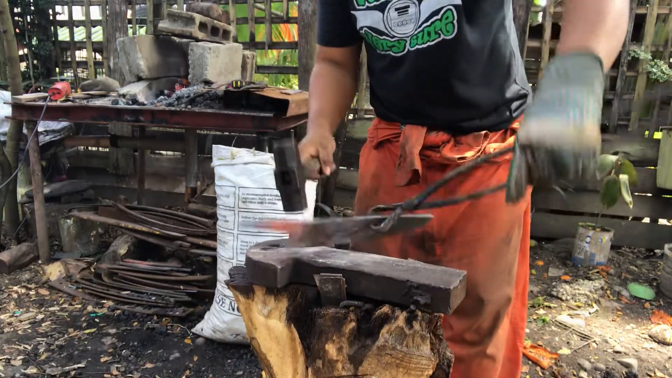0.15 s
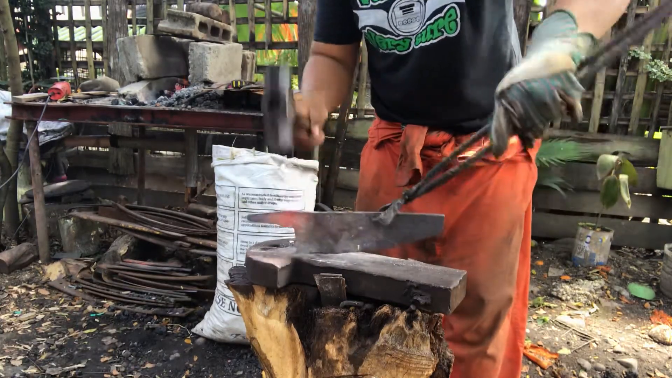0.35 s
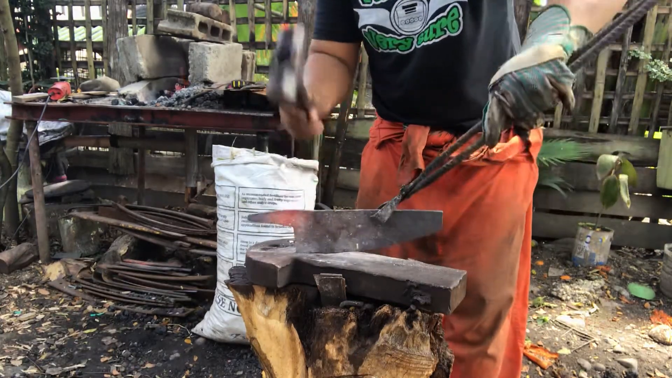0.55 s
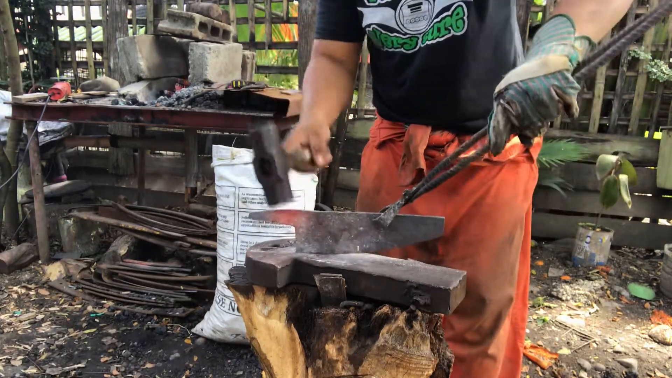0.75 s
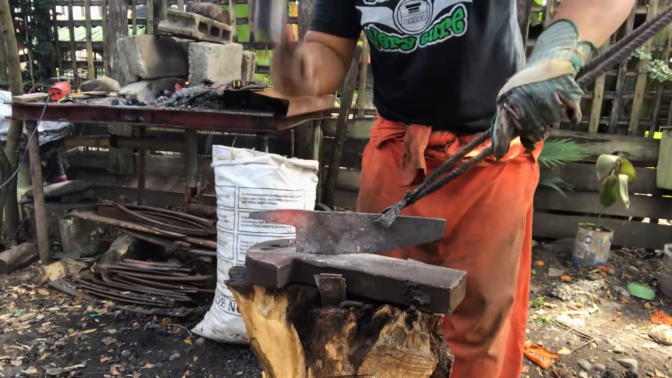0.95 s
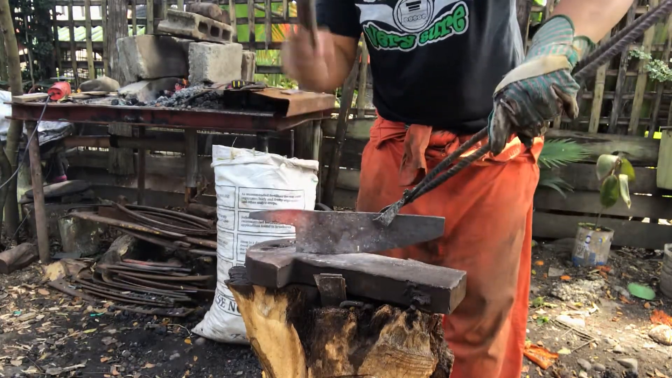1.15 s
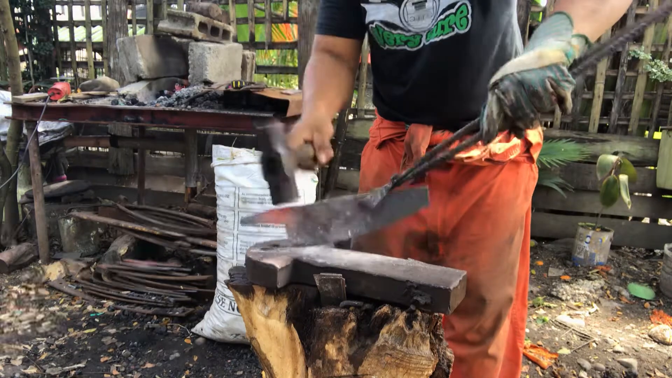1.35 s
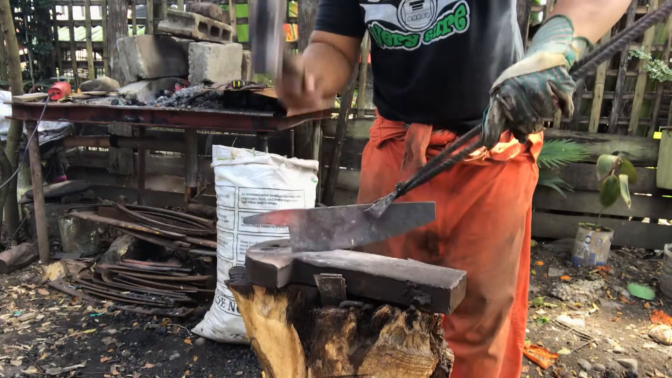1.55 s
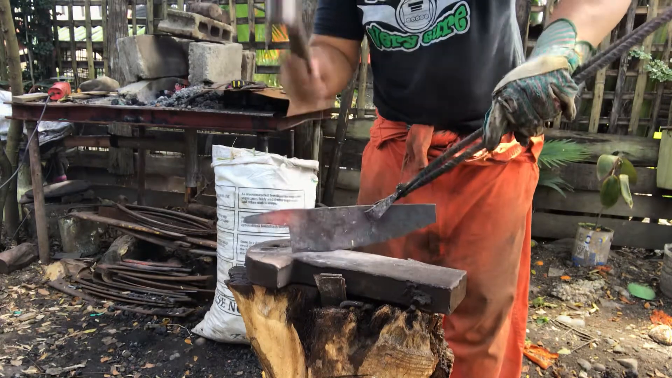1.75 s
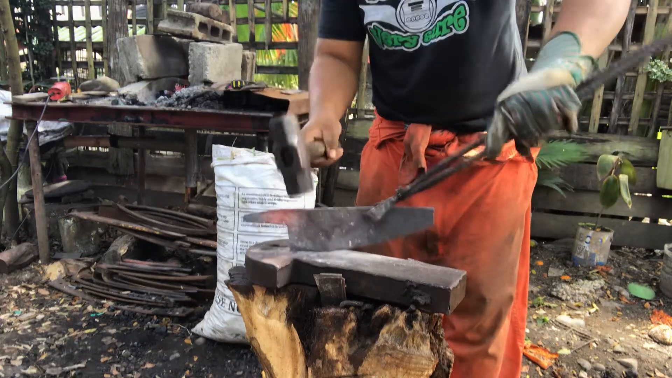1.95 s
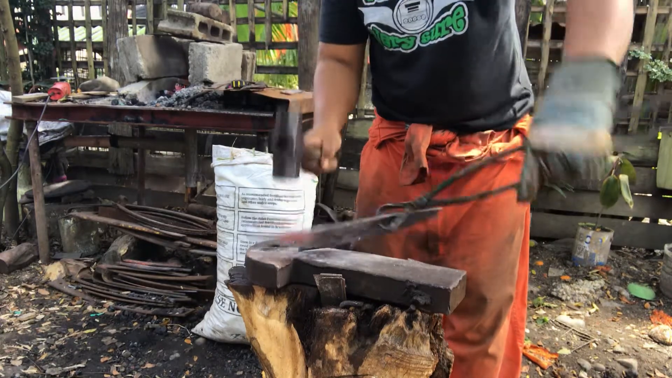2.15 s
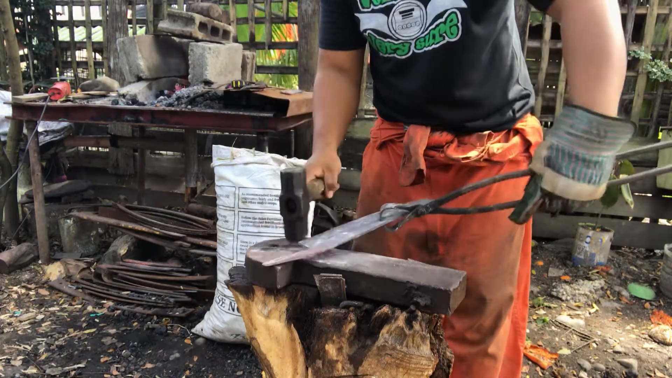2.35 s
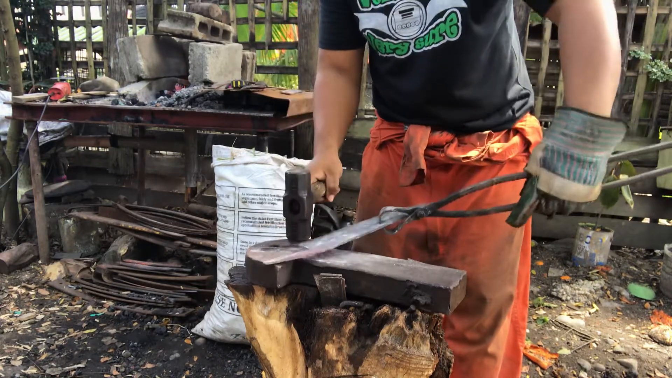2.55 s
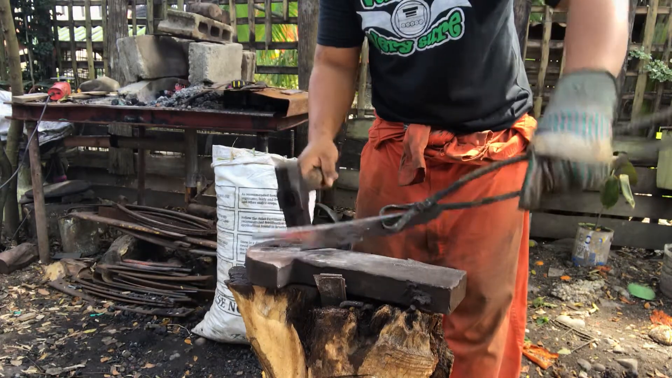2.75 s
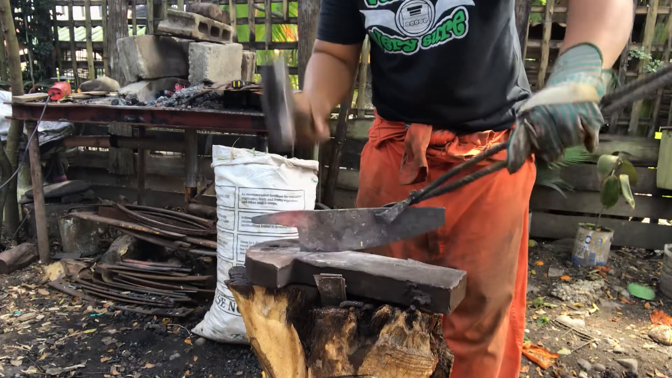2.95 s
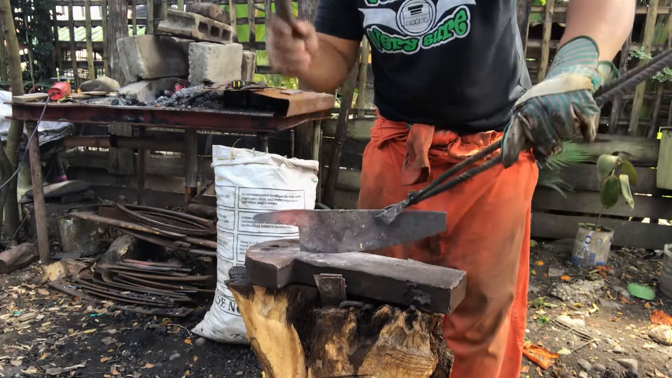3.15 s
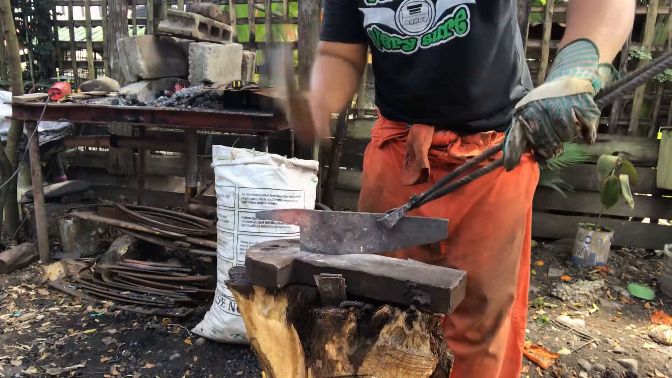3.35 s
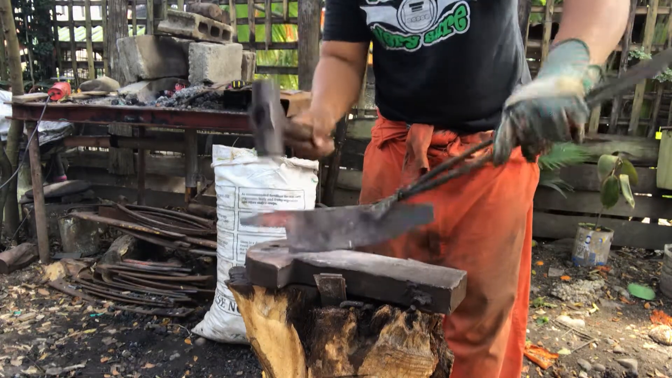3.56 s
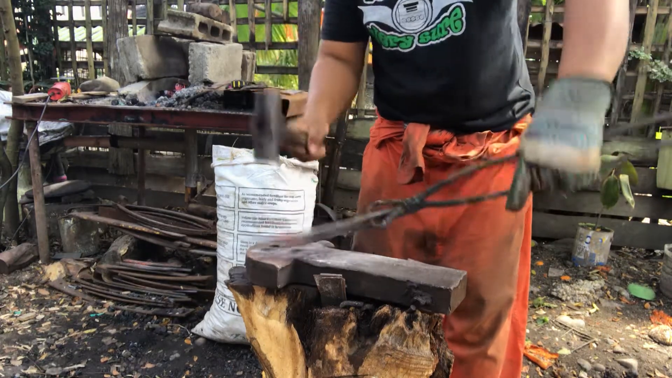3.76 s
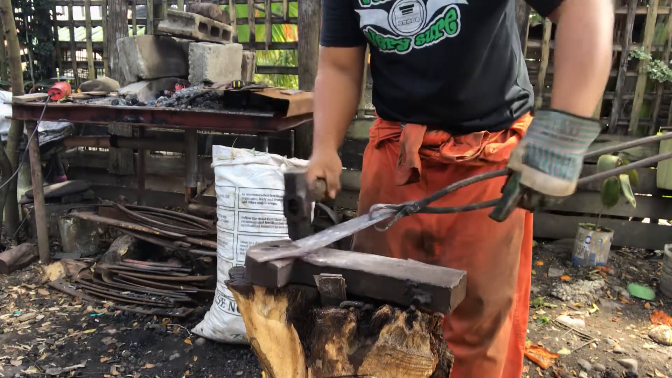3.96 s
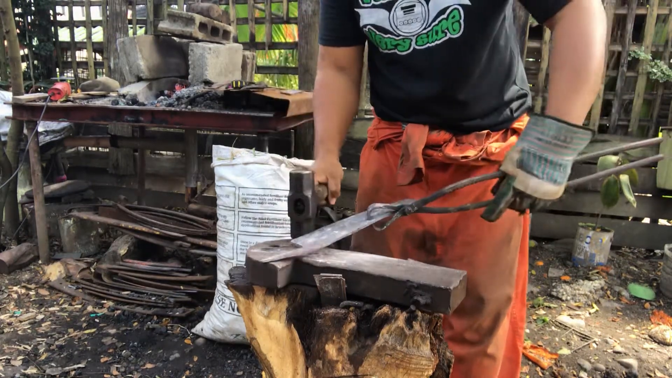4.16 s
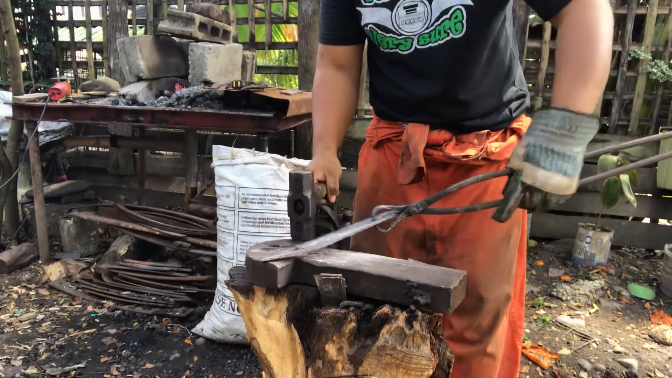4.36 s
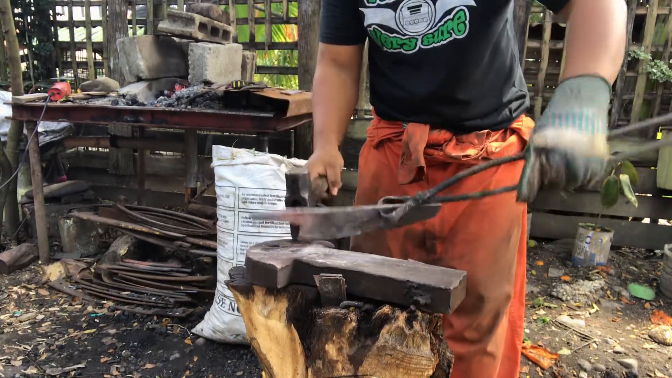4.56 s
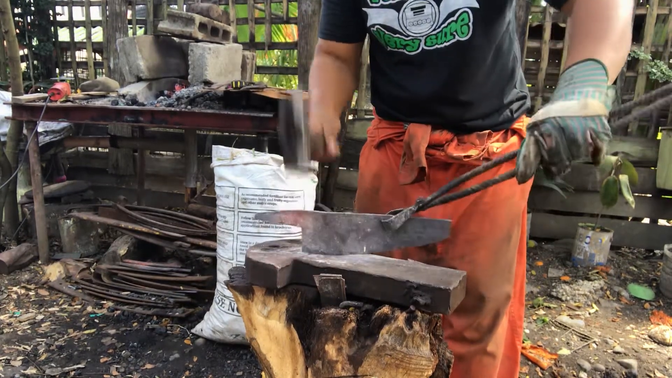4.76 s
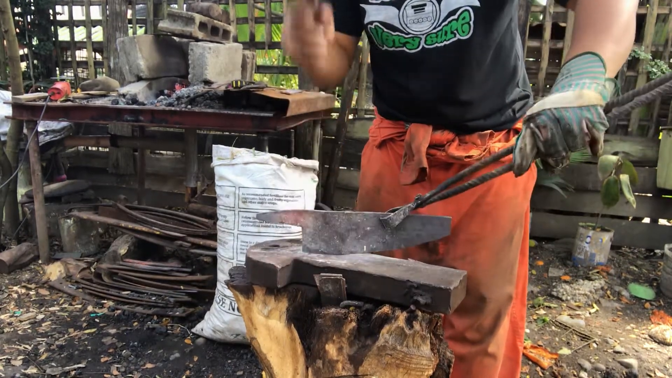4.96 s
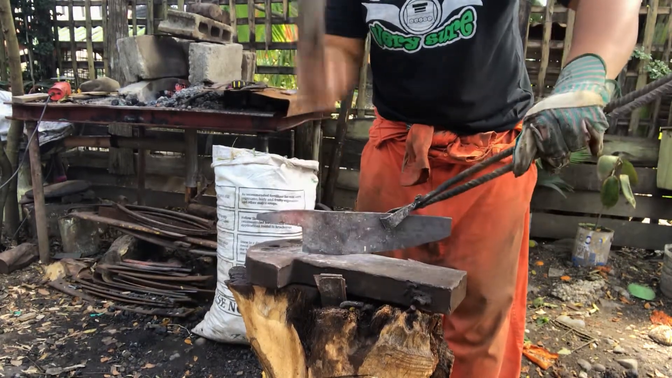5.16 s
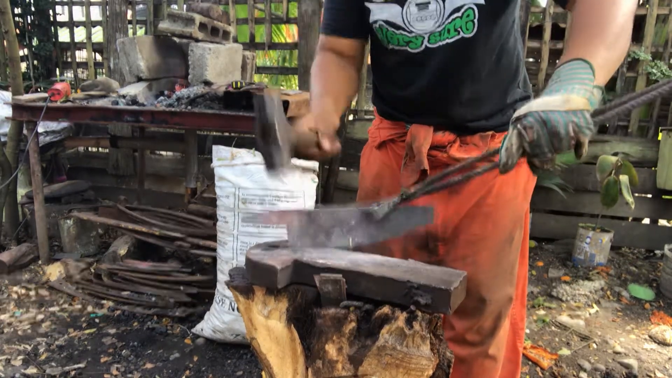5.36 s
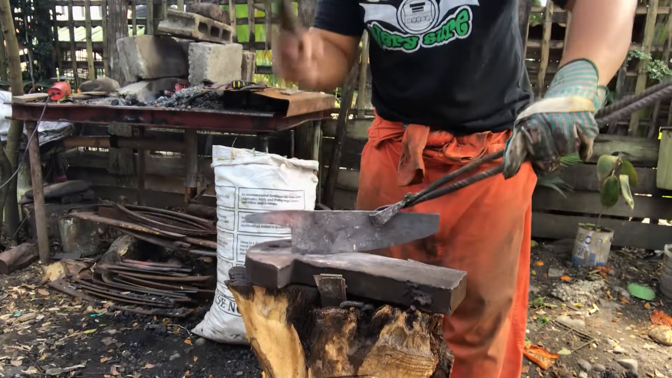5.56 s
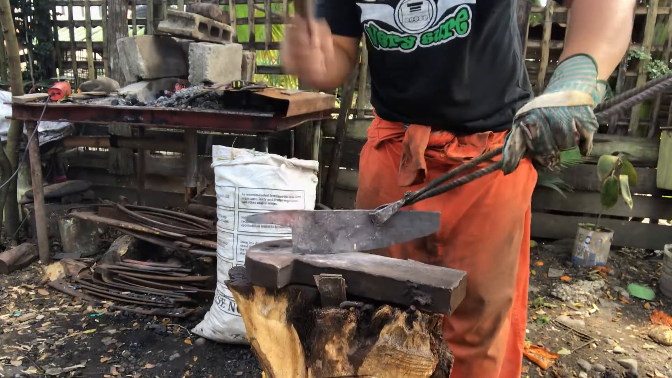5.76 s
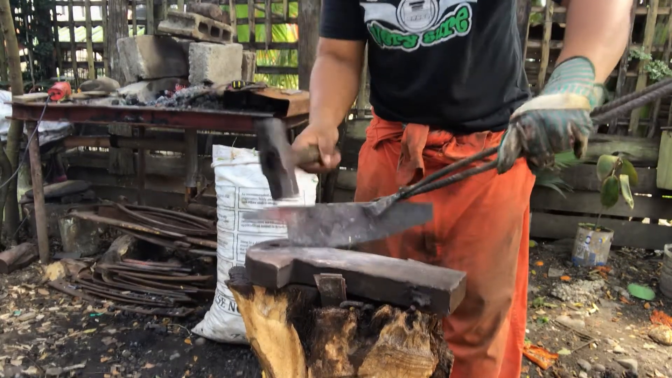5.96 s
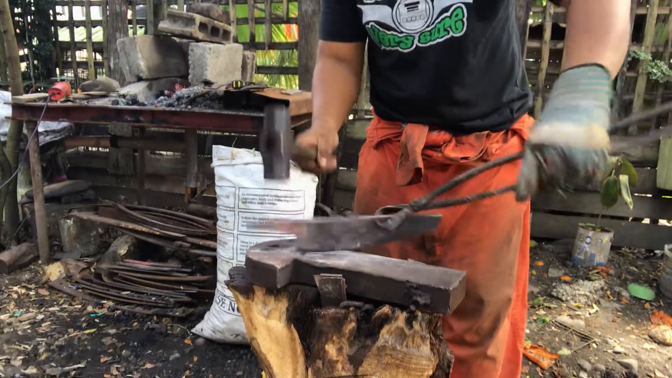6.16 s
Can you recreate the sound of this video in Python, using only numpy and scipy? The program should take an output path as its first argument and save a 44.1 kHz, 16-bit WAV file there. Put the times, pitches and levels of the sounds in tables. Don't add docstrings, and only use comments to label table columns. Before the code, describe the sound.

Close to the microphone, a hammer forges a blade on a steel bar set on a wooden stump. A light tap leads into three hard, bright, ringing blows, then duller damped ones with small metallic ticks and a short buzz as the blade is shifted. One blow falls soft and choked before two hard final strikes. Low wind rumble and faint leaf hiss surround it in an open yard.

```python
import sys
import numpy as np
from scipy import signal
from scipy.fft import rfft, irfft, next_fast_len
from scipy.io import wavfile
from scipy.ndimage import uniform_filter1d, minimum_filter1d, map_coordinates

SR = 44100
rng = np.random.default_rng(int(sys.argv[2]) if len(sys.argv) > 2 else 0)


def transcribe(u):
    v = np.clip(np.atleast_2d(u).T, -1, 1)
    q = np.round(v * 32767).astype(np.int16)
    wavfile.write(sys.argv[1], SR, q)


def elevation(decibels):
    levels = np.asarray(decibels, float)
    return 10 ** (levels / 20)


N = 273420

# start_s, crack_db, thud_db, clatter_db, blade_damping_db_per_s
BLOWS = [
    (0.2644, -23.5, -27.5, -62, 42),
    (0.6947, -0.5, -6.5, -27.5, 4.5),
    (1.301, 0, -14, -20, -3),
    (1.9006, -2.5, -7.5, -21, 7),
    (2.3291, -7.5, -25.5, -35.5, 77),
    (3.471, -1.5, -14, -21, 67.5),
    (3.996, -6.5, -27.5, -26, 116.5),
    (4.7494, -14.5, -36, -39.5, 149.5),
    (5.2978, -0.5, -8.5, -21.5, 48),
    (5.9494, -5, -9.5, -19.5, -2.5),
]
# ring_db, place_along_0_1, place_across_0_1, hardness_db_per_octave, lowest_mode_t60_s
LANDING = [(-34.7, 0.641, 0.521, -5.9, 0.26), (-14.0, 0.259, 0.373, -5.7, 0.2),
           (-1.0, 0.63, 0.496, -1.9, 0.31), (-17.1, 0.354, 0.403, 1.6, 0.27),
           (-9.1, 0.312, 0.048, -1.4, 0.29), (-5.4, 0.624, 0.006, -3.4, 0.25),
           (-2.9, 0.91, 0.677, -0.4, 0.3), (-25.0, 0.605, 0.392, -1.0, 0.21),
           (-1.7, 0.612, 0.255, 0.4, 0.29), (-2.6, 0.638, 0.66, 2.3, 0.25)]
# pitch_hz, t60_s, level_db, half_waves_along, half_waves_across
BAR_MODES = [(1530.0, 0.3, 10.8, 1.37, 0.42), (2246.0, 1.5, -0.9, 1.61, 1.71),
             (5633.0, 0.33, -2.3, 1.77, 0.57), (2735.0, 0.6, -24.01, 6.42, 2.13),
             (6142.0, 1.1, -32.47, 5.4, 2.25), (7569.0, 0.45, -23.95, 6.18, 1.17),
             (7981.0, 0.2, -6.7, 3.3, 0.5), (11535.0, 0.27, -23.5, 4.25, 2.3),
             (15335.0, 0.25, -19.27, 5.49, 5.31), (5593.0, 0.22, -14.1, 4.45, 0.0),
             (11443.0, 0.16, -18.58, 6.57, 3.78), (10120.0, 0.27, -29.9, 4.18, 0.72),
             (13670.0, 0.33, -21.7, 3.24, 0.69)]
# pitch_hz, t60_s, level_db, half_waves_along, half_waves_across
BEATING_MODES = [(3709, .4, 4.2, 3.29, 1.01), (3693, .7, -25, 2.85, 3.75), (3705.3, .9, -21.5, 2.19, 3.33)]
# pitch_hz, level_db, t60_s
WEAK_MODES = [(1165, -42.5, .25), (1750, -34.5, .2), (3190, -52.5, 0.23), (4258, -30, .25),
              (4700, -48.5, .2), (5650, -45.5, 0.28), (6230, -41.5, 0.16), (7311, -38.5, .13),
              (8840, -35, 0.25), (10400, -81, 0.092), (12200, -53.5, .25), (12795, -45.5, .2)]
# pitch_hz, width_hz, level_db
THUD_MODES = [(160, 120, -29), (318, 98, -1), (430, 90, -2), (577, 164, 11), (1000, 310, -5.5)]
# freq_hz, level_db_per_hz
CRACK_SPECTRUM = [(500, -25), (1100, 4), (3000, 2), (6000, -3), (10000, -15), (14000, -8.5), (16500, -28.5)]
# freq_hz, level_db_per_hz
CLATTER_SPECTRUM = [(300, -13), (700, -3.5), (2000, -5.5), (5000, -4.5), (9000, -14), (15000, -17.5),
                    (16500, -27.5)]
# start_s, peak_db, low_rel_db, bar_ring_db
TICKS = [(0.4738, -38, -7, -66), (1.4183, -44.5, 9, -63), (2.1565, -37.5, -29, -72), (2.6594, -36, -5, -77),
         (3.5984, -22, 1.5, -61.5), (3.6174, -28, 2, -37), (3.6344, -47, 15, -62), (3.8397, -32.5, -4, -72),
         (3.9454, -33, -8, -60), (4.0444, -26, 6, -49), (4.2662, -35.5, -1.5, -67), (4.4672, -35, 0, -60),
         (4.767, -38.5, 16.5, -59), (5.4231, -13.5, -4, -54.5), (5.4444, -26, -5.5, -32.5),
         (5.6765, -35, -3.5, -59), (6.0387, -15.5, -4.5, -52.5)]
# start_s, end_s, level_db
RATTLES = [
    (2.335, 2.453, -27.5),
    (4.0, 4.1, -29),
    (2.31, 2.33, -49),
]
# freq_hz, level_db_per_hz
BUZZ_SPECTRUM = [(800, -33), (2000, -24.5), (5000, 3.5), (9000, 4.5), (12000, -10.5), (15500, -16),
                 (16500, -18)]
# delay_s, level_db
ECHOES = [(.0032, -8), (.0058, -13), (.0105, -19), (.017, -26)]
# time_s, level_db
WIND_COURSE = [(0.0, -63), (0.55, -54), (0.67, -46), (0.83, -57), (1.14, -58.5), (1.55, -41), (1.83, -46.5),
               (2.26, -60), (3.02, -56.5), (3.9, -48.5), (4.27, -41.5), (4.45, -50), (4.73, -46),
               (5.08, -49), (5.3, -42.5), (5.65, -54), (6.2, -44.5)]
# freq_hz, level_db_per_hz
RUMBLE_SPECTRUM = [(12, -41.5), (20, -15), (54, 2.5), (80, 1), (134, -5.5), (256, -23), (300, -27.5),
                   (390, -47), (660, -120)]
# start_s, peak_db, pitch_hz
PUFFS = [(0.599, -39.5, 69), (1.529, -36, 77.5), (1.614, -30, 114), (1.711, -26.5, 107), (3.915, -50, 90),
         (4.281, -36.5, 59.6), (4.401, -45.5, 100), (4.56, -42.5, 61), (4.856, -30, 88),
         (4.895, -14.5, 71.4), (5.05, -54.5, 68.7), (5.22, -54, 60), (5.769, -55.5, 79.8),
         (5.849, -58, 60.4)]
# centre_s, width_s, rise_db
SWELLS = [
    (3.6, 0.46, 2),
    (4.549, 0.3, 3.5),
]
# freq_hz, level_db_per_hz
HISS_SPECTRUM = [(88, -37), (150, -5.5), (255, -3), (518, -7), (583, -6.5), (767, -7.5), (2010, -12.5),
                 (2220, -15), (2500, -14), (6680, -19), (10500, -26.5), (15300, -24.5), (16500, -51.5)]
# centre_s, level_db, pitch_hz
KNOCKS = [(.91, -45, 710), (1.69, -45.5, 845), (2.84, -44.5, 846), (3.135, -46.5, 644), (4.25, -41, 560),
          (4.56, -46, 770), (5.771, -47, 1000), (5.77, -45, 514)]
# centre_s, level_db, from_hz, to_hz
CHIRPS = [
    (4.555, -58, 3900, 4050),
    (4.585, -60, 5300, 5600),
]


def unit(x):
    return x / np.sqrt(np.mean(x ** 2) + 1e-20)


def noise(spectrum, size):
    hz, db = np.transpose(spectrum)
    m = next_fast_len(size + 2048)
    log_bins = np.log(np.fft.rfftfreq(m, 1 / SR) + 1)
    gain = elevation(np.interp(log_bins, np.log(hz), db, left=-120, right=-120))
    return unit(irfft(rfft(rng.standard_normal(m)) * gain, m)[:size])


def wobble(rate_hz):
    knots = rng.standard_normal(int(N * rate_hz / SR) + 4)
    return map_coordinates(knots, [np.arange(N) * rate_hz / SR])


def add(track, start_s, sound):
    part = track[round(start_s * SR):][:len(sound)]
    part += sound[:len(part)]


def ring(t, hz, db, t60_s, rise_s=0.00067):
    return elevation(db - 60 * t / t60_s) * np.sin(2 * np.pi * hz * t) * (1 - np.exp(-t / rise_s))


def impact(t, crack_db, thud_db, clatter_db):
    light_db, dull_db, clatter_t60_s = -6.5, 14, 0.15
    thud = sum(ring(t, hz, db + thud_db + rng.normal(0, 1.8), 1.75 / width_hz, rise_s=0.0017)
               for hz, width_hz, db in THUD_MODES)
    spectrum = [(hz, db - dull_db * (hz > 7000) * (crack_db < light_db)) for hz, db in CRACK_SPECTRUM]
    crack = elevation(crack_db - 60 * t / 0.014) * noise(spectrum, len(t))
    clatter = elevation(clatter_db - 60 * t / clatter_t60_s) * noise(CLATTER_SPECTRUM, len(t))
    return thud + crack + clatter


def bar_ring(t, landing, damping):
    ring_db, along_pos, across_pos, hardness, lowest_t60_s = landing
    mode_hz, mode_t60_s, mode_db, along, across = np.transpose(BAR_MODES + BEATING_MODES)
    shape = np.sin(np.pi * along * along_pos) * np.cos(np.pi * across * across_pos)
    tilt_db = hardness * np.log2(mode_hz / mode_hz[0])
    level_db = ring_db + mode_db + 20 * np.log10(np.abs(shape) + .01) + tilt_db + 4
    t60_s = 60 / (60 / mode_t60_s + damping * (mode_hz[1] / mode_hz) ** 0.86)
    lowest = ring(t, mode_hz[0], level_db[0], lowest_t60_s, rise_s=0.0048)
    return lowest + sum(np.sign(shape[k]) * ring(t, mode_hz[k], level_db[k], t60_s[k], rise_s=.004)
                        for k in range(1, len(shape)))


def hammer():
    knock, bar = np.zeros(N), np.zeros(N)
    t = np.arange(SR) / SR
    short = t[:SR // 3]
    settle_s = 0.047
    for (start_s, crack_db, thud_db, clatter_db, damping), landing in zip(BLOWS, LANDING):
        rests_s = [end + settle_s - start_s for start, end, _ in RATTLES
                   if start > start_s and end - start > .05]
        rest_s = min(rests_s, default=1.5)
        contact_s = .003 if rest_s > .3 else .0008
        choke_db = np.clip(400 * (t - rest_s), 0, 12) + 35 * np.clip(t - rest_s, 0, 1)
        add(bar, start_s + contact_s, bar_ring(t, landing, damping) * elevation(-choke_db))
        weak = sum(ring(short, hz, db + 16 + clatter_db + rng.normal(0, 3), t60_s)
                   for hz, db, t60_s in WEAK_MODES)
        add(bar, start_s + contact_s, elevation(-damping * short) * weak)
        add(knock, start_s + .001, impact(short, crack_db, thud_db, clatter_db))
    return knock, bar


def blade_ticks():
    out, t = np.zeros(N), np.arange(SR // 2) / SR
    fall = elevation(-60 * t / 0.02) + 0.5 * elevation(-60 * t / 0.063)
    for start_s, db, low_db, ring_db in TICKS:
        bright = noise([(2200, -20.5), (3000, 14.0), (6000, 8.0), (15500, -8.5)], len(t))
        dull = noise([(500, -16.0), (1100, -4.5), (1900, -7), (2600, -5.5)], len(t))
        tick = elevation(db - 11.5) * fall * (bright + elevation(low_db) * dull)
        tick += ring(t, BAR_MODES[1][0], ring_db, 0.53)
        tick += ring(t, 1890, db + low_db - 13.0, 0.053)
        add(out, start_s, tick)
    return out


def blade_buzz():
    out, t = np.zeros(N), np.arange(SR // 2) / SR
    contacts_per_s = 900
    for start_s, end_s, db in RATTLES:
        length_s = end_s - start_s
        fade = 1 / (1 + np.exp(np.clip((t - length_s) / 0.012, -50, 50)))
        level_db = db - 10 + 34 * t + 3.5 * wobble(140)[:len(t)]
        add(out, start_s, elevation(level_db) * fade * noise(BUZZ_SPECTRUM, len(t)))
        for when, pitch, weakness in rng.random((round(contacts_per_s * length_s), 3)):
            contact_db = db - 12 + 4 * when - 14 * weakness
            contact = ring(t[:SR // 10], 2500 + 12000 * pitch ** 3.5, contact_db, 0.096)
            add(out, start_s + when * length_s, contact)
    return out


def wind():
    wind_db = np.interp(np.arange(N) / SR, *np.transpose(WIND_COURSE))
    out = elevation(wind_db + 0.13 + 4.2 * wobble(12)) * noise(RUMBLE_SPECTRUM, N)
    t = np.arange(SR // 8) / SR
    for start_s, db, hz in PUFFS:
        turns = np.cumsum(hz * (1 + 4.2 * np.exp(-t / 0.0024))) / SR
        envelope = elevation(db - 60 * t * hz / 5) * (1 - np.exp(-t / 0.001))
        add(out, start_s, envelope * np.sin(2 * np.pi * turns))
    return out


def far_knocks_and_birds():
    out, t = np.zeros(N), np.arange(SR // 8) / SR
    bump = np.exp(-((t - .03) / 0.021) ** 2)
    for centre_s, db, hz in KNOCKS:
        band = [(hz * 0.74, -16), (hz, 0), (hz * 1.53, -16)]
        add(out, centre_s - .03, elevation(db) * bump * noise(band, len(t)))
    for centre_s, db, from_hz, to_hz in CHIRPS:
        turns = np.cumsum(np.interp(t, [0, t[-1] / 2], [from_hz, to_hz])) / SR
        add(out, centre_s - .03, elevation(db) * bump * np.sin(2 * np.pi * turns))
    return out


def yard_noise():
    now_s = np.arange(N) / SR
    leaves_db = sum(db * np.exp(-((now_s - centre_s) / width_s) ** 2) for centre_s, width_s, db in SWELLS)
    return elevation(-49.0 + leaves_db + 0.94 * wobble(9)) * noise(HISS_SPECTRUM, N)


def yard_tail(source):
    t = np.arange(SR // 3) / SR
    colour = noise([(200, 0.5), (1000, -7), (8000, -10.5), (16000, -26.5)], len(t))
    tail = colour * elevation(-60 * t / 0.26) * (t > .01)
    return signal.fftconvolve(source, tail / np.linalg.norm(tail))[:N]


def scene():
    knock, bar = hammer()
    knock = knock + blade_ticks() + blade_buzz()
    near = sum(elevation(db) * np.pad(knock, (round(delay_s * SR), 0))[:N] for delay_s, db in ECHOES)
    far = elevation(-24) * yard_tail(knock + elevation(-15) * bar)
    background = wind() + far_knocks_and_birds() + yard_noise()
    return (bar + knock + near + far + background)[None]


def gain_control(dry):
    level_db = 10 * np.log10(np.abs(uniform_filter1d(dry[0] ** 2, 400)) + 1e-12)
    t = np.arange(N) / SR
    held_db = np.maximum.accumulate(np.maximum(level_db + 12, 0) + 30 * t) - 30 * t
    step_db = np.interp(t - .037, t, held_db)
    memory = t[:SR // 2] * np.exp(-t[:SR // 2] / 0.27)
    sag_db = signal.fftconvolve(np.maximum(level_db + 28.0, 0), memory / memory.sum())[:N]
    return dry * elevation(-.55 * step_db - .3 * sag_db)


def limiter(x):
    need = minimum_filter1d(np.minimum(1, 0.97 / (np.abs(x) + 1e-9)), size=61)
    return x * uniform_filter1d(need, size=31)


def band_limit(x):
    return signal.sosfilt(signal.butter(12, 16800, fs=SR, output="sos"), x)


def record(dry):
    x = gain_control(dry)
    lead_in = rng.standard_normal(900) * np.linspace(.1, 1, 900)
    x = x + elevation(-32.0) * signal.fftconvolve(x[0], lead_in / np.linalg.norm(lead_in))[-N:]
    return band_limit(limiter(x))


dry = scene()
out = record(dry)
transcribe(out)
```